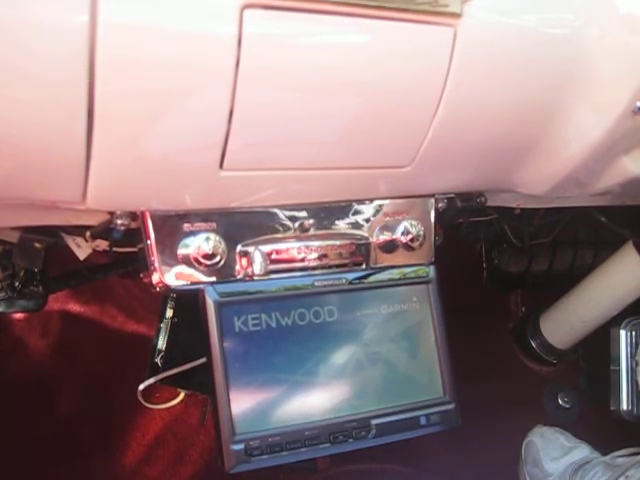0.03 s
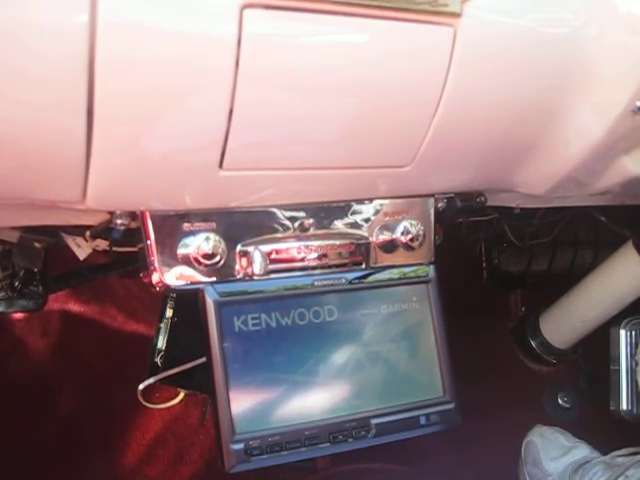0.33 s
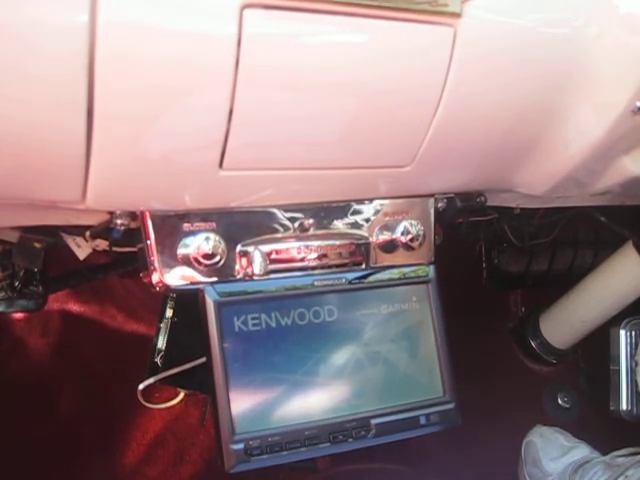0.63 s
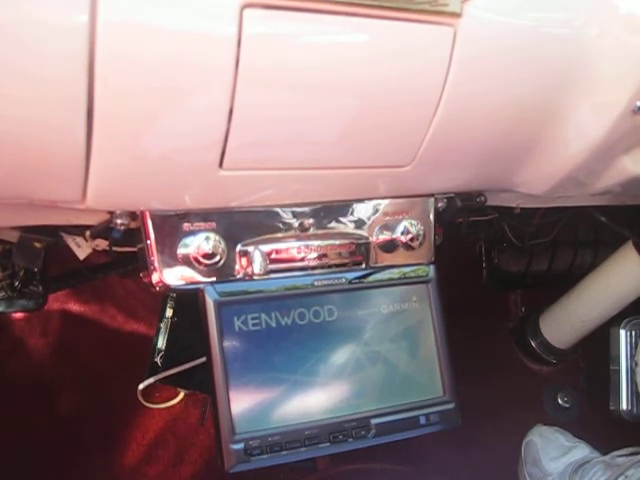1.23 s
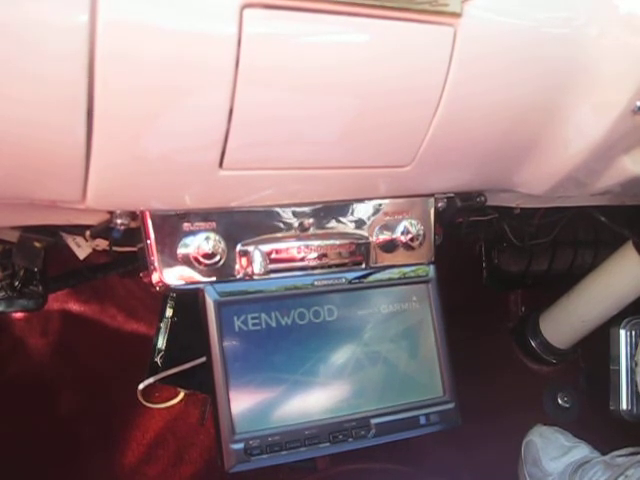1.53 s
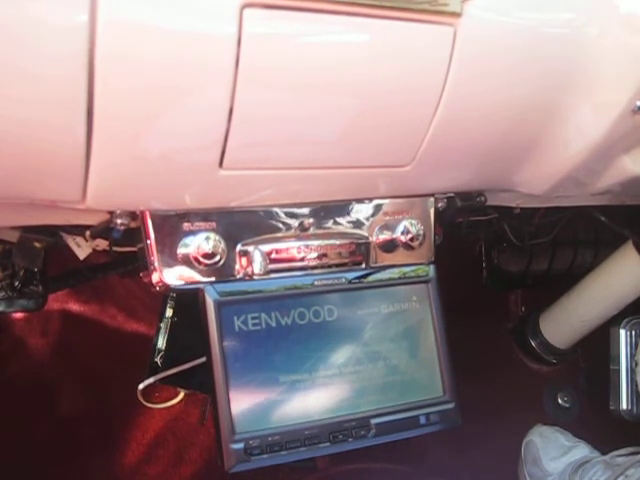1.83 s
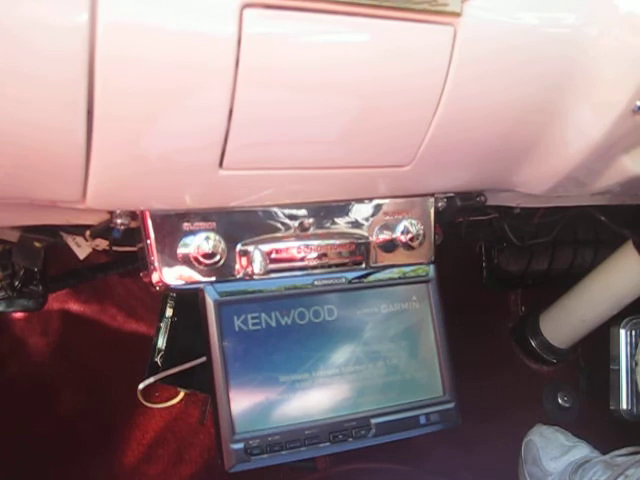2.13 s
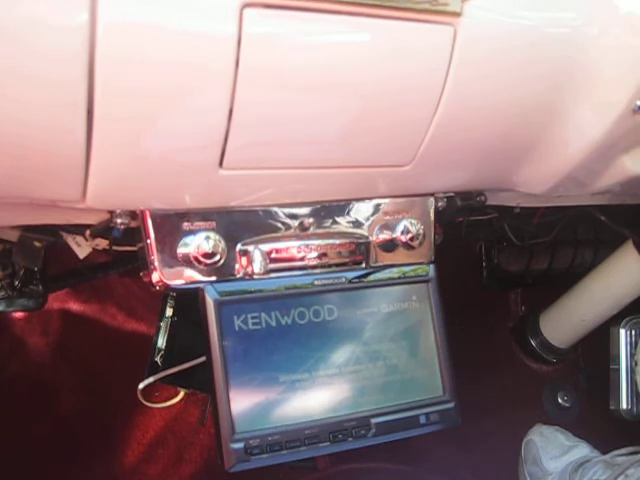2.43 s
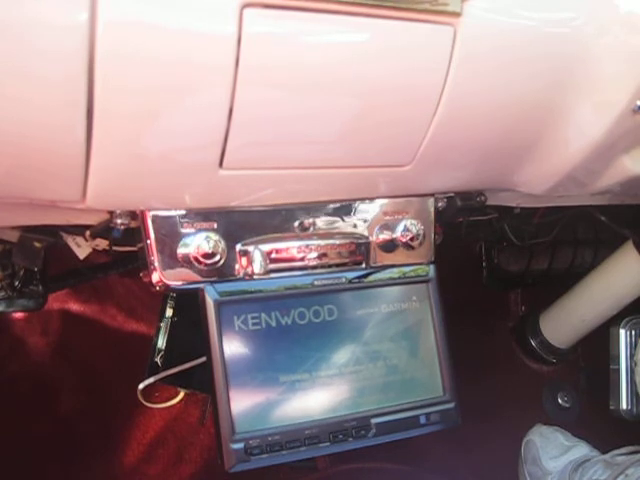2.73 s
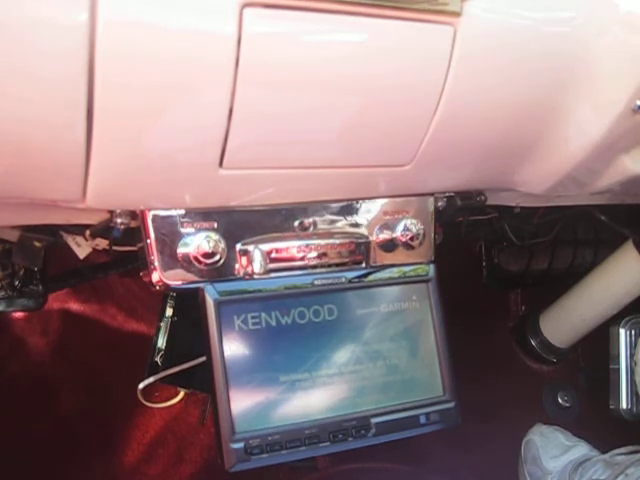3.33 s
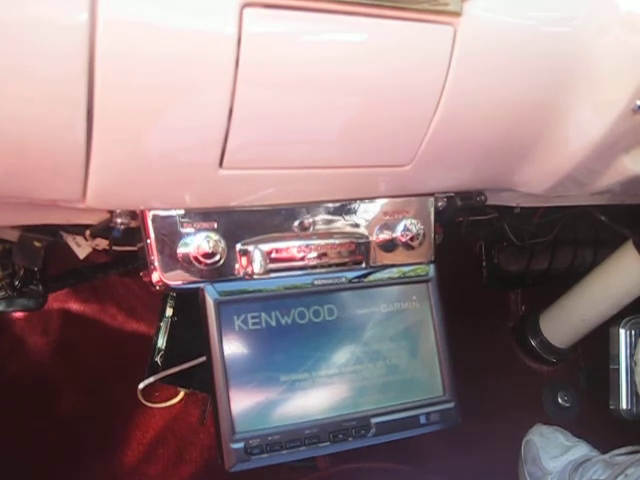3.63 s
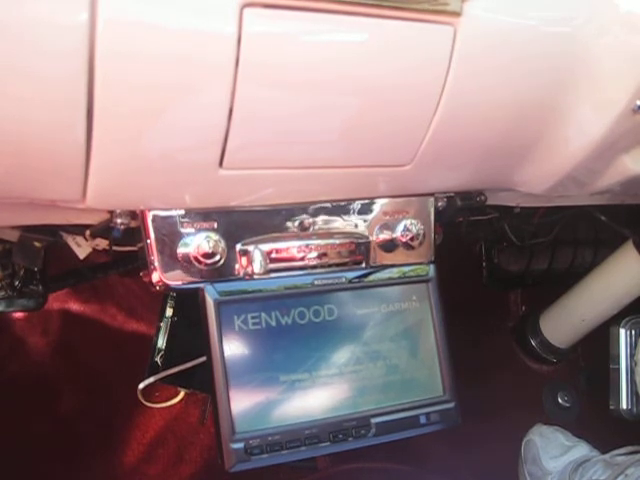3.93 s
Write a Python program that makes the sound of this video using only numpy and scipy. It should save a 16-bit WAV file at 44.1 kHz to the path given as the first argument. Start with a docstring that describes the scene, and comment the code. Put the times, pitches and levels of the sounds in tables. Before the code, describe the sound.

A plastic dashboard switch snaps in hard, then clicks back out more softly, with light ticks and faint finger rubbing around it. The microphone is close, inside a parked car with the engine idling low and a small fan humming.

```python
"""Dashboard switch in an idling car

Inside a parked car, one microphone close in front of the dashboard. A hand works a switch: light
plastic ticks, a tiny squeak and two hard snaps that ring the panel, with soft rubbing between them.
All around are the boom of the idling engine, a small fan and faint drones. The recorder's gain
control ducks after the hardest snap and creeps back."""
import sys
import numpy as np
from scipy import signal
from scipy.fft import rfft, irfft
from scipy.io import wavfile
from scipy.ndimage import uniform_filter1d

SR = 44100
rng = np.random.default_rng(int(sys.argv[2]) if len(sys.argv) > 2 else 0)


def wrap_up_sound(samples):
    """Save the sound to the file named by the first command line argument, as 16-bit audio."""
    columns = np.atleast_2d(samples).T
    # keep every value between -1 and 1, then stretch to whole-number steps
    tamed = np.clip(columns, -1, 1)
    steps = np.round(tamed * 32767).astype(np.int16)
    wavfile.write(sys.argv[1], SR, steps)


N = 176400
TIME = np.arange(N) / SR


# The switch pushed in, then let out: t/s, knock level/dB, crack level/dB, tail level/dB
SWITCH_STROKES = [(1.5555, -17, -21, -33), (3.1685, -26.5, -29, -40)]
# Modes of the panel around it: f/Hz, t60/s, level pushed in/dB, level let out/dB
PANEL_MODES = [(294.6, 0.07, -26.5, -24), (531, 0.063, -21, -26), (734.2, 0.063, -17.5, -19.5),
               (898, 0.031, -20, -28), (1078, 0.055, -11.5, -19), (1347, 0.029, -26, -23),
               (2005, 0.35, -44, -58), (2116, 0.065, -30.5, -35), (2600, 0.017, -19.5, -52),
               (3350, 0.03, -33, -40), (3790, 0.031, -27, -35), (6160, 0.0055, -24.5, -33)]
# Spectra of the dull knock, sharp crack and ringing tail: f/Hz, relative level/dB
KNOCK_SPECTRUM = [(100, -35), (280, 6), (550, 2.5), (1550, -6.5), (2600, -13), (8000, -29)]
CRACK_SPECTRUM = [(500, -41), (1500, 7), (2400, -1.5), (4000, 0.5), (5200, -4), (6200, -6.5), (8000, -8.5),
                  (13000, -10), (15500, -24)]
TAIL_SPECTRUM = [(250, 2), (580, 20), (1000, 4), (1700, -3), (2020, -3), (2600, -29), (8000, -38)]

def switch_snaps(rise_s=0.01, knock_lead_s=0.0011):
    """Each snap rings the panel; knock and crack scatter round the cabin and leave a faint tail."""
    panel, knock, crack, tail = 0, 0, 0, 0
    for stroke, (start, knock_db, crack_db, tail_db) in enumerate(SWITCH_STROKES):
        knock += from_db(knock_db) * burst(start - knock_lead_s, knock_lead_s + rise_s, t60=0.07)
        crack += from_db(crack_db) * burst(start, rise_s / 2, t60=0.029)
        tail += from_db(tail_db) * burst(start, rise_s, t60=0.61)
        for mode, (hz, t60, *stroke_db) in enumerate(PANEL_MODES):
            swing = (-1) ** mode * np.sin(2 * np.pi * hz * (TIME - start))
            panel += from_db(stroke_db[stroke]) * burst(start, rise=0.0042, t60=t60) * swing
    return (panel + knock * unit_rms(noise(KNOCK_SPECTRUM))
            + crack * unit_rms(noise(CRACK_SPECTRUM))
            + tail * unit_rms(noise(TAIL_SPECTRUM)))


# Light touches on the switch: t/s, high-band t60/s, low level/dB, middle level/dB, high level/dB
TOUCHES = [(0.1002, 0.051, -40, -52, -47.5), (1.153, .032, -37, -38.5, -49), (1.1695, 0.04, -32, -37, -46),
           (1.5197, 0.077, -35, -41.5, -43.5), (1.639, 0.048, -57, -64, -39),
           (1.7896, 0.067, -39, -46, -44.5), (2.056, 0.052, -41.5, -52.5, -68),
           (2.119, 0.052, -66, -47, -55), (2.611, 0.045, -39.5, -55, -60), (2.93, 0.041, -43, -46, -68),
           (3.112, 0.047, -48, -48, -51), (3.392, 0.038, -40.5, -48, -47), (3.449, 0.082, -38, -59, -64),
           (3.786, 0.056, -42, -62, -64), (3.923, 0.035, -38, -52, -68)]
# Spectra of a tick's three bands: f/Hz, relative level/dB
TICK_LOW_SPECTRUM = [(150, -26), (450, -2), (1150, -2), (2000, -15), (10000, -29)]
TICK_MID_SPECTRUM = [(900, -7), (2100, 3), (2800, 9.5), (4200, -5.5), (5800, 1), (8000, -32)]
TICK_HIGH_SPECTRUM = [(3000, -14), (5500, 2.5), (9000, 2.5), (13500, 0.5), (15500, -12)]

def plastic_ticks(rise_share=0.088, ring_ratio=1.2):
    """Touches of plastic: a softer one starts and dies more slowly, and the high band dies first."""
    ticks = 0
    for band, spectrum in enumerate((TICK_LOW_SPECTRUM, TICK_MID_SPECTRUM, TICK_HIGH_SPECTRUM)):
        longer = ring_ratio ** (2 - band)
        envelope = sum(from_db(band_db[band]) * burst(start, rise_share * t60, t60 * longer)
                       for start, t60, *band_db in TOUCHES)
        ticks += envelope * unit_rms(noise(spectrum))
    return ticks


def plastic_squeak(start_s=1.1677, start_hz=3460, end_hz=1980, sag_s=0.0067):
    """Plastic slips with a tiny chirp whose pitch sags as the pressure lets go."""
    hz = end_hz + (start_hz - end_hz) * np.exp(-np.maximum(TIME - start_s, 0) / sag_s)
    envelope = from_db(-32.5) * burst(start_s, rise=0.0021, t60=0.054)
    return envelope * np.sin(2 * np.pi * np.cumsum(hz) / SR)


# The hand brushing the switch: peak t/s, rise/s, fall/s, dull level/dB, bright level/dB
HAND_RUBS = [(.27, 0.029, 0.072, -54.5, -52.5), (.70, 0.055, 0.14, -55, -59.5),
             (1.42, 0.16, 0.15, -57.5, -59), (2.13, .03, 0.018, -57, -67), (2.67, 0.12, 0.15, -49.5, -61),
             (3.62, 0.19, 0.18, -54, -58)]
# Spectra of the dull and the bright friction: f/Hz, relative level/dB
DULL_RUB_SPECTRUM = [(300, -5), (900, 3.5), (2700, -1), (5000, -9), (10000, -36)]
BRIGHT_RUB_SPECTRUM = [(2000, -17), (5500, 8.5), (9000, 1.5), (15000, -4)]

def hand_rubs(grain_db=2):
    """Faint grainy friction of the hand that swells and fades."""
    dull, bright = 0, 0
    for peak, rise, fall, dull_db, bright_db in HAND_RUBS:
        swell = np.exp(-((TIME - peak) / np.where(TIME < peak, rise, fall)) ** 2)
        dull += from_db(dull_db) * swell
        bright += from_db(bright_db) * swell
    friction = dull * unit_rms(noise(DULL_RUB_SPECTRUM)) + bright * unit_rms(noise(BRIGHT_RUB_SPECTRUM))
    return friction * from_db(grain_db * drift(45))


# Firing rate of the four-cylinder engine: t/s, f/Hz
FIRING_RATE = [(0.0, 39.95), (0.45, 41.6), (0.75, 40.16), (1.35, 40.4), (1.6, 38.52), (2.1, 38.66),
               (2.6, 40.79), (2.9, 40.78), (3.2, 40.06), (3.45, 37.65), (4.0, 37.24)]
# Engine tones in the cabin: multiple of the four-firing cycle, level/dB, unsteadiness (0-1)
ENGINE_TONES = [(4, -23.5, 0), (5, -36, 0.38), (6, -38.5, 0.82), (8, -38.5, 0.43), (10, -62.5, 0.1),
                (12, -42.5, 0.3)]
# Rumble and hiss around the microphone: f/Hz, relative level/dB
CABIN_SPECTRUM = [(28, -95), (50, -15.5), (75, -20), (120, -21.5), (160, -33.5), (350, -38), (520, -44),
                  (800, -46.5), (1400, -54.5), (3000, -60), (6000, -64.5), (8700, -69), (9900, -67),
                  (13500, -73.5), (16000, -76)]

def idling_engine(throb_depth=0.33):
    """Boom of uneven cylinders, heard from inside; the cabin noise throbs a little with each firing."""
    firings = np.cumsum(np.interp(TIME, *np.transpose(FIRING_RATE))) / SR
    cycle_phase = 2 * np.pi * firings / 4
    tones = 0
    for order, db, unsteadiness in ENGINE_TONES:
        waver = 1 + unsteadiness * (drift(2.1) + 1j * drift(2.7))  # in both level and phase
        tones += from_db(db) * np.sqrt(2) * np.real(waver * np.exp(1j * order * cycle_phase))
    cabin = from_db(12) * noise(CABIN_SPECTRUM)
    rumble = signal.sosfilt(signal.butter(2, 900, fs=SR, output="sos"), cabin)
    return tones + cabin + throb_depth * rumble * np.cos(2 * np.pi * firings)


# Tones of the small fan: multiple of its turning rate, level/dB
FAN_TONES = [(7, -50), (8, -43), (9, -50.5), (11, -58.5), (12, -55.5)]

def fan(turn_hz=51.73, wander=0.0015, flutter=0.08):
    """A steady motor hum, strongest at the blade rate."""
    turn_phase = 2 * np.pi * np.cumsum(turn_hz * (1 + wander * drift(3.3))) / SR
    return sum(from_db(db) * np.sqrt(2) * (1 + flutter * drift(1.3))
               * np.sin(order * turn_phase + rng.uniform(0, 2 * np.pi)) for order, db in FAN_TONES)


# Hums in the background of the cabin: start t/s, end t/s, f/Hz, level/dB
CABIN_HUMS = [(0, 3.4, 242, -52), (3.2, 4.2, 331.6, -43.5)]

def cabin_hums(fade_s=0.2, width_hz=6.8):
    """Faint, rough, wavering drones that come and go."""
    hums = 0
    for start, end, hz, db in CABIN_HUMS:
        fade = np.clip(np.minimum(TIME - start, end - TIME) / fade_s, 0, 1)
        waver = drift(width_hz) + 1j * drift(width_hz)
        hums += from_db(db) * fade * np.real(waver * np.exp(2j * np.pi * hz * TIME))
    return hums


def from_db(db):
    """Decibels to gain."""
    return 10 ** (np.asarray(db) / 20)


def unit_rms(x):
    """Scale to unit rms."""
    return x / np.sqrt(np.mean(x ** 2) + 1e-20)


def drift(rate_hz):
    """Smooth random wander of unit rms, mostly slower than rate_hz."""
    hop, settle = 40, 2000
    pole = np.exp(-2 * np.pi * rate_hz * hop / SR)
    white = rng.standard_normal(N // hop + settle + 2)
    slow = signal.lfilter([1], [1, -2 * pole, pole * pole], white)[settle:]
    return np.interp(np.arange(N) / hop, np.arange(len(slow)), unit_rms(slow))


def noise(spectrum):
    """White noise coloured by rows of f/Hz, level/dB, rolling off below the first."""
    hz, db = np.transpose(spectrum)
    bins = np.maximum(np.fft.rfftfreq(N, 1 / SR), 1)
    gain = from_db(np.interp(np.log(bins), np.log(hz), db)) * np.minimum(bins / hz[0], 1)
    return irfft(rfft(rng.standard_normal(N)) * gain, N)


def burst(start, rise, t60):
    """Envelope of a blow: a quick rise, then a fall of 60 dB every t60 seconds."""
    age = TIME - start
    return np.clip(age / rise, 0, 1) * from_db(-60 * np.clip((age - rise) / t60, 0, 3))


def scene():
    """Everything that reaches the microphone in front of the dashboard, in mono."""
    background = idling_engine() + fan() + cabin_hums()
    switch = switch_snaps() + plastic_ticks() + plastic_squeak() + hand_rubs()
    fade_in = np.minimum(TIME / 0.006, 1)
    return ((switch + background) * fade_in)[None]


def record(dry):
    """Gain control that ignores the bass, ducks fast and recovers slowly, then a steep top cut."""
    threshold_db, max_duck_db, recovery_db_per_s = -19, 3, 6
    window_s, attack_s = 0.016, 0.012
    bass_cut_hz, top_cut_hz = 200, 15700
    sensed = signal.sosfilt(signal.butter(2, bass_cut_hz, "high", fs=SR, output="sos"), dry[0])
    power = uniform_filter1d(sensed ** 2, int(window_s * SR))
    over_db = np.maximum(10 * np.log10(np.maximum(power, 1e-12)) - threshold_db, 0)
    recovery_db = recovery_db_per_s * TIME
    held_db = np.maximum.accumulate(over_db + recovery_db) - recovery_db  # each peak ebbs steadily
    pole = np.exp(-1 / (attack_s * SR))
    duck_db = signal.lfilter([1 - pole], [1, -pole], np.minimum(held_db, max_duck_db))
    top_cut = signal.ellip(12, 0.1, 90, top_cut_hz, fs=SR, output="sos")
    return signal.sosfilt(top_cut, dry * from_db(-duck_db))


dry = scene()
out = record(dry)
wrap_up_sound(out)
```